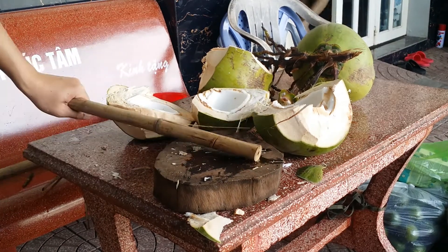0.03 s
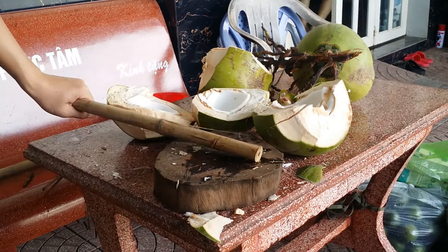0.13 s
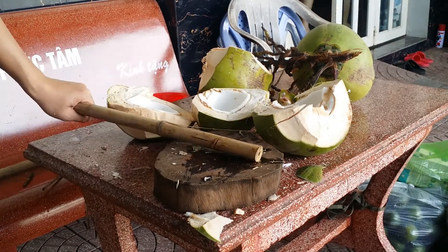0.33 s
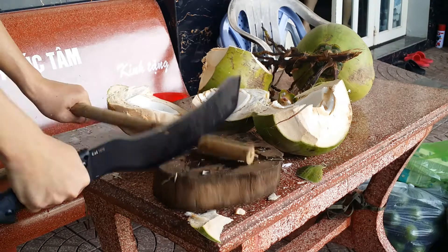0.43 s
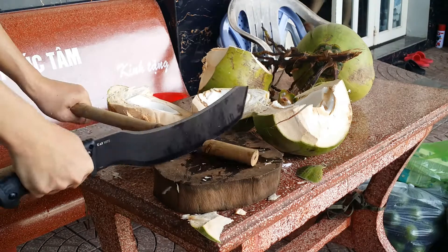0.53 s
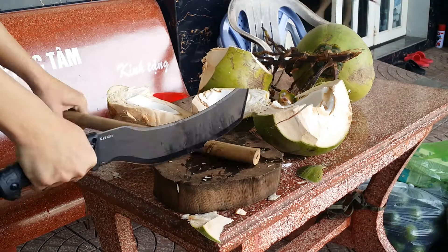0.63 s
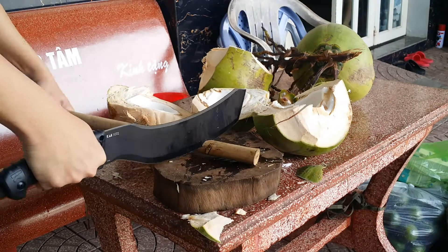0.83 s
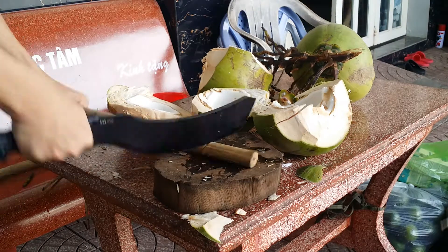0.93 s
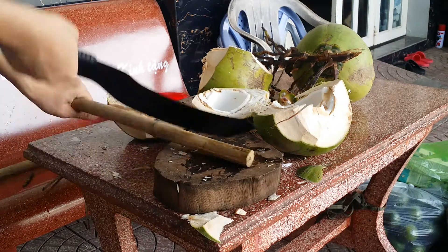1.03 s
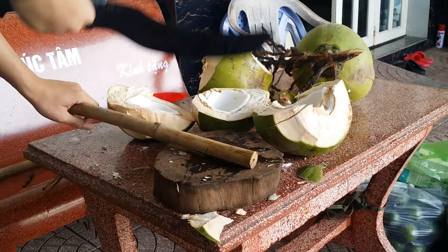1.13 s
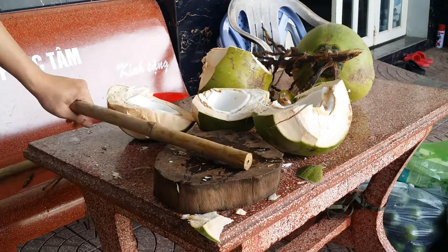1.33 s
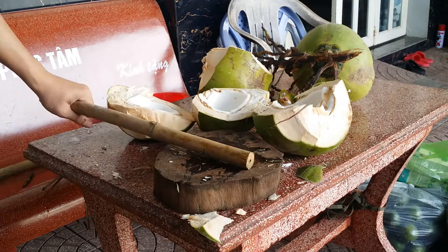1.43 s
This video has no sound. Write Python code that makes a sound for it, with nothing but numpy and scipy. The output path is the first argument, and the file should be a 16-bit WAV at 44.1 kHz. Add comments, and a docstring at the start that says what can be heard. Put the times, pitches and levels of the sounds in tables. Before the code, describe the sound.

One hard blade chop into a hollow stick on a wooden block, close and slightly overloaded, with rapid rattling knocks, quick wall echoes, then a very faint steel ring; low hum beneath, left side muffled.

```python
"""Paved yard: a heavy blade chops a hollow stick on a wooden block over a swelling, sinking hum and street wash.
The stick rattles in a train of knocks made of decaying modes and fibre noise; house walls return short
rings and a grainy noise wash. The blade later rings faintly in beating sines as it is pulled free.
The left microphone port is muffled by filtering; the blow overloads the right one in a soft limiter."""
import sys
import numpy as np
from scipy import signal
from scipy.fft import rfft, irfft
from scipy.io import wavfile
from scipy.ndimage import uniform_filter1d

SR = 44100
rng = np.random.default_rng(int(sys.argv[2]) if len(sys.argv) > 2 else 0)


def voltage_ratio(decibels):
    """Convert decibels (scalar or array-like) to amplitude ratios, 20 dB per decade."""
    exponent = np.asarray(decibels, float) / 20
    return 10 ** exponent


def to_wav(s):
    """Save 16-bit WAV."""
    ch = np.atleast_2d(s).T  # columns
    pcm = np.round(np.clip(ch, -1, 1) * 32767)  # PCM
    wavfile.write(sys.argv[1], SR, pcm.astype(np.int16))


N = 66150


def read(table, x, log=False):
    """Columns of a table interpolated at x, on a log axis if asked."""
    points = np.array(table, float)
    axis = (lambda v: np.log(np.maximum(v, 1))) if log else (lambda v: v)
    return [np.interp(axis(x), axis(points[:, 0]), column) for column in points[:, 1:].T]


def colour(x, table):
    """Filter by (frequency [Hz], gain [dB], optional phase lag [rad]); ends mirrored outwards first."""
    wide = np.concatenate([x[..., ::-1], x, x[..., ::-1]], axis=-1)
    gain_db, *lag_rad = read(table, np.fft.rfftfreq(3 * N, 1 / SR), log=True)
    response = voltage_ratio(gain_db) * np.exp(-1j * sum(lag_rad))
    return irfft(rfft(wide) * response, 3 * N)[..., N:-N]


def unit(x):
    """Scale to rms 1."""
    return x / np.sqrt(np.mean(x ** 2))


def walk(rate_hz):
    """Random levels, one per 1 / rate_hz, joined by ramps; spread near 1."""
    hold = int(SR / rate_hz)
    steps = np.repeat(rng.standard_normal(N // hold + 1), hold)
    return 1.5 * uniform_filter1d(steps, hold)[:N]


def fade(t, t60_s):
    """Silence before t = 0, then exponential decay, 60 dB per t60_s."""
    return (t >= 0) * voltage_ratio(-60 * np.maximum(t, 0) / t60_s)


# background course: (time [s], hum level [dB], street level [dB], hiss level [dB])
BACKGROUND = [(0, -36, -44.5, -62), (.15, -36, -40.5, -65.5), (.2, -30, -39, -61.5), (.27, -31, -37, -68.5),
              (.33, -26, -35.5, -65), (.38, -36, -42, -67), (.5, -35, -39.5, -84), (.55, -41.5, -48, -74),
              (.74, -47, -50, -76), (.85, -45.5, -55, -85), (1.0, -41, -53.5, -78), (1.13, -45, -51, -78),
              (1.2, -41.5, -51.5, -80), (1.38, -40.5, -50.5, -76), (1.42, -34, -47.5, -73),
              (1.5, -29, -44.5, -70)]
# hum resonances: (frequency [Hz], width [Hz], level [dB])
HUM_PEAKS = [(105, 30, -8), (124, 24, 5), (156.5, 32, -3.5)]
# street wash spectrum: (frequency [Hz], relative density [dB per Hz])
STREET_SPECTRUM = [(15, -66), (25, -46), (71, -29), (127, -5.5), (235, -18), (423, -18.5), (476, -21.5),
                   (728, -22.5), (900, -27.5), (2150, -32), (3300, -38), (7000, -54), (9100, -90),
                   (15400, -120)]


def background(t):
    """Narrow resonances on noise give a wavering hum; broad shaped noise gives the street wash."""
    hum_db, street_db, _ = read(BACKGROUND, t)
    hz = np.fft.rfftfreq(N, 1 / SR)
    shape = sum(voltage_ratio(db) / (1 + (2 * (hz - f) / width) ** 2) for f, width, db in HUM_PEAKS)
    hum = unit(irfft(rfft(rng.standard_normal(N)) * shape, N))
    street = colour(rng.standard_normal(N), STREET_SPECTRUM)
    above_300_hz = signal.sosfilt(signal.butter(2, 300, "high", fs=SR, output="sos"), street)
    street = street / np.std(above_300_hz)
    return voltage_ratio(hum_db) * hum + voltage_ratio(street_db + 0.95 * walk(25)) * street


HISS_HZ, HISS_LEFT_DB = 7000, -9  # high-pass corner; left relative to right


def hiss(t):
    """Thin high-passed noise, independent in the two ports."""
    highpass = signal.butter(3, HISS_HZ, "high", fs=SR, output="sos")
    noise = signal.sosfilt(highpass, rng.standard_normal((2, N)))
    port_gain = voltage_ratio(np.array([[HISS_LEFT_DB], [0]]))
    return voltage_ratio(read(BACKGROUND, t)[2]) * unit(noise) * port_gain


CONTACT_S = 0.00042
SCATTER_DB, DETUNE = 2, .015  # random spread of mode level; of pitch, as a fraction


def ring(modes, t):
    """Decaying sines after a brief contact, with random strengths, signs and slight detuning."""
    total = 0
    for hz, db, t60_s in modes:
        strength, sign, shift = rng.standard_normal(3)
        gain = voltage_ratio(db + SCATTER_DB * strength) * np.sign(sign)
        total = total + gain * fade(t, t60_s) * np.sin(2 * np.pi * hz * (1 + DETUNE * shift) * t)
    return (1 - np.exp(-t / CONTACT_S)) * total / 2


# blow, then knocks of the stick: (time [s], ring level [dB], fibre crack level [dB])
KNOCK_TIMES = [(.3845, 6, 0), (.3893, -10, -22), (0.3931, -4.5, -24), (0.3988, -4, -8), (.4043, -13, -15),
               (0.4066, -6.5, -20)]
# returns from single walls: (time [s], level [dB], favoured frequency [Hz])
WALL_SLAPS = [(.4305, 0, 1700), (.4343, 6, 800), (.443, 1, 1950), (.4545, -1, 1400), (.4715, -5, 1500),
              (.479, -2, 900), (.49, -5, 1400), (.503, -8, 1000), (.5165, -4, 900)]
# stick and block modes: (frequency [Hz], relative level [dB], t60 [s])
WOOD_MODES = [(210, -18, .12), (450, -19, .04), (950, -14, .025), (1300, -10, .018), (1650, 1, .034),
              (1950, -8, .03), (2600, -12, .012), (3170, -11, .01), (4180, -6, .007)]
# fibre crack spectrum: (frequency [Hz], relative level [dB])
CRACK_SPECTRUM = [(1000, -16), (2500, -1), (3300, 2), (4200, 2), (5800, -4), (7500, -28), (10500, -18),
                  (13000, -26), (15000, -25)]
BLOW_S = KNOCK_TIMES[0][0]
CRACK_RISE_S, CRACK_TAIL_S = .0003, 0.0018  # exponential time constants
SLAP_DB_PER_OCTAVE, SLAP_T60_S = 9, .014
EDGE_DB, EDGE_S = -13, .0008  # bright tick of the steel edge; its delay and Gaussian width


def knocks(t):
    """Each knock rings the wood and cracks its fibres; each wall returns a brief ring near its own colour."""
    out = np.zeros(N)
    fibres = unit(colour(rng.standard_normal(N), CRACK_SPECTRUM))

    def after(start_s):
        """Samples of the 0.2 s after an onset."""
        return slice(int(start_s * SR) + 1, int(start_s * SR) + SR // 5)

    for start_s, ring_db, crack_db in KNOCK_TIMES:
        span = after(start_s)
        u = t[span] - start_s
        crack = fibres[span] * (1 - np.exp(-u / CRACK_RISE_S)) * np.exp(-u / CRACK_TAIL_S)
        out[span] += voltage_ratio(ring_db) * ring(WOOD_MODES, u) + voltage_ratio(crack_db) * crack
    for start_s, slap_db, wall_hz in WALL_SLAPS:
        span = after(start_s)
        # wood modes with level differences halved, weaker away from wall_hz
        modes = [(hz, db / 2 - SLAP_DB_PER_OCTAVE * abs(np.log2(hz / wall_hz)), SLAP_T60_S)
                 for hz, db, _ in WOOD_MODES]
        out[span] += voltage_ratio(slap_db) * ring(modes, t[span] - start_s)
    tick = rng.standard_normal(N) * np.exp(-((t - BLOW_S - EDGE_S) / EDGE_S) ** 2)
    return out + voltage_ratio(EDGE_DB) * tick


# wash spectrum: (frequency [Hz], relative density [dB per Hz])
YARD_SPECTRUM = [(90, -33.5), (150, -11), (545, -11.5), (730, -3.5), (1180, -5), (1450, 0), (2100, -6),
                 (3000, -11.5), (5000, -18.5), (6200, -31), (7200, -37), (10000, -40.5), (12000, -50),
                 (15000, -59.5)]
# decay of the far wash: (frequency [Hz], t60 [s])
FAR_DECAY = [(200, 0.45), (1500, 0.24), (5000, 0.32), (12000, 0.16)]
NEAR_DB, NEAR_T60_S = -13, .24
FAR_DB, FAR_FULL_S, FAR_RISE_S, FAR_HOLD_S = -18.5, .049, .016, 0.036  # full after blow; rise ends there
LATE_DB, LATE_T60_S = -23, 0.69
GRAIN_DB, GRAINS_PER_S = 2.5, 400  # level spread; highest rate, lower in the bass


def yard(t):
    """Dense grainy reflections: a short near wash, a later one from the houses, a thin long tail."""
    u = t - BLOW_S
    v = u - FAR_FULL_S
    spectrum = rfft(unit(colour(rng.standard_normal(N), YARD_SPECTRUM)))
    hz = np.fft.rfftfreq(N, 1 / SR)
    near_late = voltage_ratio(NEAR_DB) * fade(u, NEAR_T60_S) + voltage_ratio(LATE_DB) * fade(u, LATE_T60_S)
    far_rise = np.clip(v / FAR_RISE_S + 1, 0, 1)
    out = 0
    for centre_hz in 125 * 2. ** np.arange(8):  # overlapping octave bands
        octaves_off = np.clip(np.log2((hz + 1) / centre_hz), -1, 1)
        band = irfft(spectrum * np.cos(np.pi / 2 * octaves_off) ** 2, N)
        band = band * voltage_ratio(GRAIN_DB * walk(min(GRAINS_PER_S, centre_hz / 4)))
        far_t60_s = read(FAR_DECAY, centre_hz, log=True)[0]
        far = far_rise * voltage_ratio(-60 * np.maximum(v - FAR_HOLD_S, 0) / far_t60_s)
        out = out + band * (near_late + voltage_ratio(FAR_DB) * far)
    return out


# blade modes: (frequency [Hz], level [dB], t60 [s], beat [Hz], signed partner strength [ratio],
# delay [s], after-ring level [dB])
BLADE_MODES = [(2548, 1, .085, 51, .3, 0, -19), (3653, -8, .15, -51, -1, .005, -21),
               (4200, -24, .12, 60, .5, 0, -36), (5118, -12, .14, 52, .8, 0, -22),
               (6193, -21, .15, 60, -.8, .003, -31), (7270, -23, .15, 110, .8, 0, -36),
               (7800, -25, .1, 90, -.7, 0, -40)]
# dense high modes: (frequency [Hz], relative level [dB])
SHIMMER_SPECTRUM = [(3000, -19), (6000, -4), (7800, 1), (8700, -16), (10000, 2), (13500, -12), (15000, -10)]
TINK_S, TINK_DB, TINK_RISE_S = .8605, -41, 0.002
LINGER_T60_S = .5  # after-ring of every pair
FLUTTER_DB, FLUTTER_RAD, FLUTTERS_PER_S, FLUTTER_GROWS_S = 2.5, 1.3, 260, .022
SHIMMER_DB, SHIMMER_T60_S = -60.5, 0.28


def blade(t):
    """Steel rings in beating pairs that flutter more as the blade wobbles; noise stands for dense high modes."""
    u = np.maximum(t - TINK_S, 0)
    grown = 1 - np.exp(-u / FLUTTER_GROWS_S)
    lines = 0
    for hz, db, t60_s, beat_hz, mate, delay_s, linger_db in BLADE_MODES:
        phase = 2 * np.pi * hz * u + FLUTTER_RAD * grown * walk(FLUTTERS_PER_S)
        mate_drift = 2 * np.pi * beat_hz * u + FLUTTER_RAD * grown * walk(FLUTTERS_PER_S / 4)
        pair = np.sin(phase) + mate * np.sin(phase + mate_drift)
        flutter = voltage_ratio(FLUTTER_DB * grown * walk(FLUTTERS_PER_S))
        decay = voltage_ratio(db) * fade(u, t60_s) + voltage_ratio(linger_db) * fade(u, LINGER_T60_S)
        onset = np.clip((u - delay_s) / TINK_RISE_S, 0, 1)
        lines = lines + flutter * pair * decay * onset
    shimmer = unit(colour(rng.standard_normal(N), SHIMMER_SPECTRUM)) * fade(t - TINK_S, SHIMMER_T60_S)
    return voltage_ratio(TINK_DB) * lines + voltage_ratio(SHIMMER_DB) * shimmer


# right-port sound shared by the left: (frequency [Hz], gain [dB], phase lag [rad])
LEFT_SHARED = [(40, -6, .4), (170, -6.5, .5), (260, -7.3, .63), (430, -13.5, .75), (690, -18, 1.05),
               (1030, -27, 1.2), (2000, -40, 1.3), (6000, -65, 1.3)]
# left port's own dull pickup: (frequency [Hz], gain [dB])
LEFT_MUFFLE = [(40, -10), (100, -22), (260, -17), (450, -14), (700, -16), (1300, -18), (2400, -24),
               (5000, -23), (6200, -40), (8500, -42), (11500, -21), (15000, -12)]


def scene():
    """Right port hears all; left adds its shared bass to a dull pickup of the same knocks and its own noise."""
    t = np.arange(N) / SR
    direct = knocks(t)
    # same knocks, independent draws of the rest
    right, other = (direct + yard(t) + blade(t) + background(t) for _ in range(2))
    left = colour(right, LEFT_SHARED) + colour(other, LEFT_MUFFLE)
    return np.array([left, right]) + hiss(t)


# microphone response: (frequency [Hz], gain [dB])
MIC_RESPONSE = [(20, -24), (40, -8), (60, 0), (14300, 0), (15000, -22), (17000, -34)]
CEILING = 1  # full scale


def microphone(dry):
    """Input soft-limits the loudest peaks, then rolls off both ends of the spectrum."""
    flat = dry / (1 + np.abs(dry / CEILING) ** 4) ** .25
    return colour(flat, MIC_RESPONSE)


def band_limit(x):
    """A steep low-pass at the top of the band."""
    return signal.sosfilt(signal.butter(12, 15730, fs=SR, output="sos"), x)


def record(dry):
    """Passes the scene through the microphone input and returns the finished recording."""
    mix = microphone(dry)
    return band_limit(mix)


dry = scene()
out = record(dry)
to_wav(out)
```